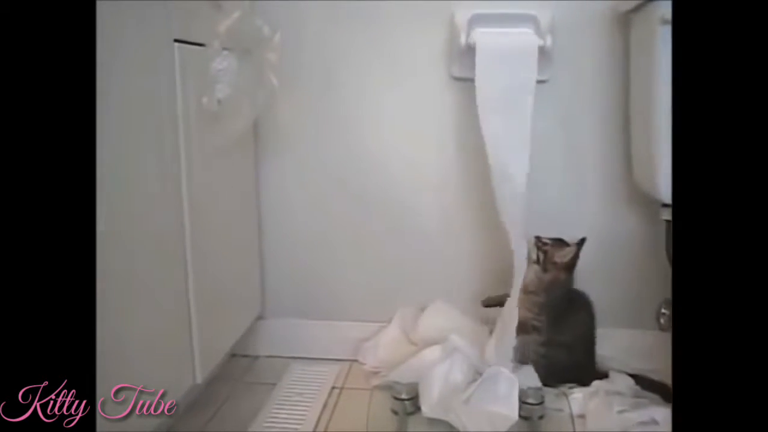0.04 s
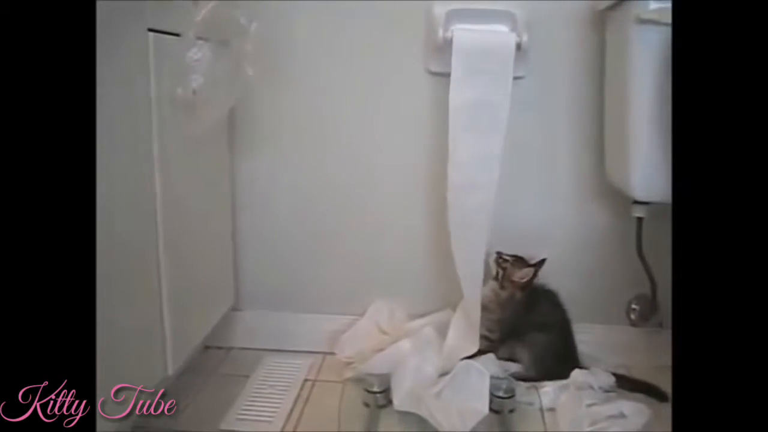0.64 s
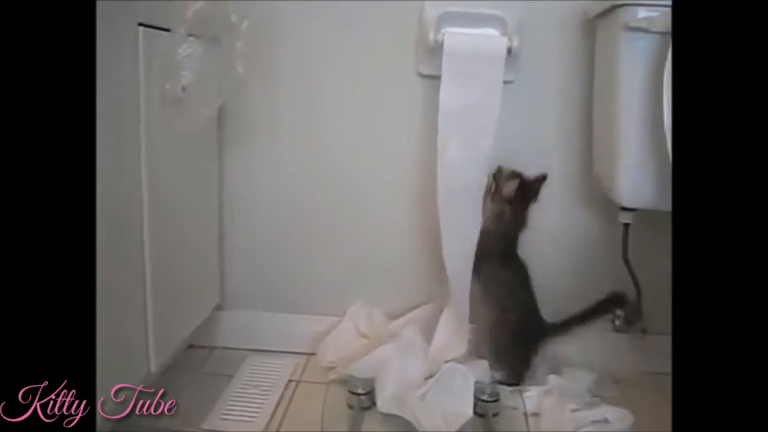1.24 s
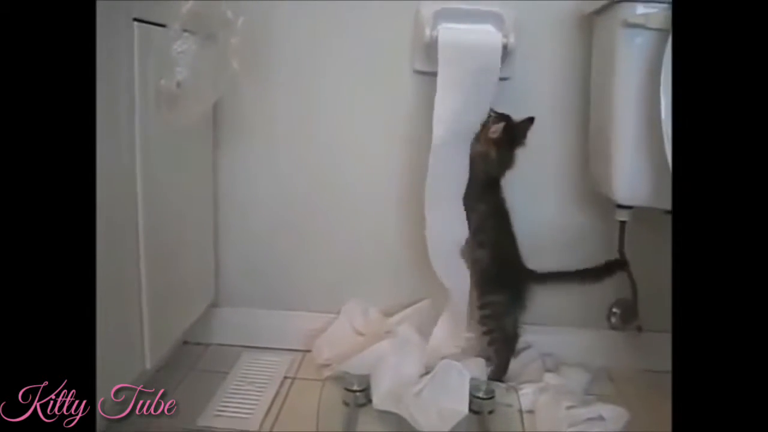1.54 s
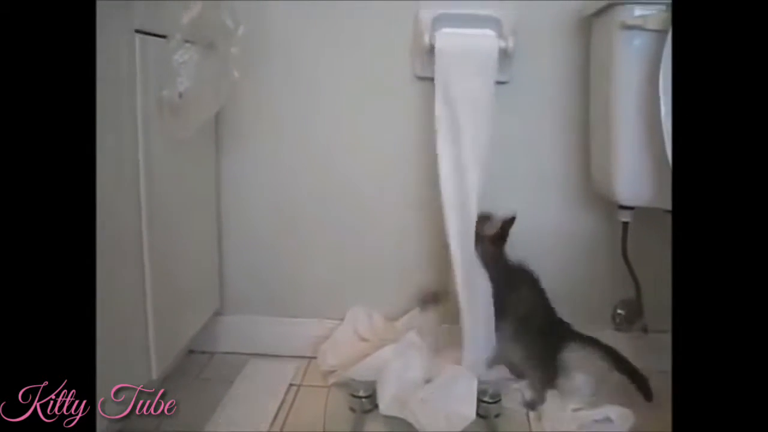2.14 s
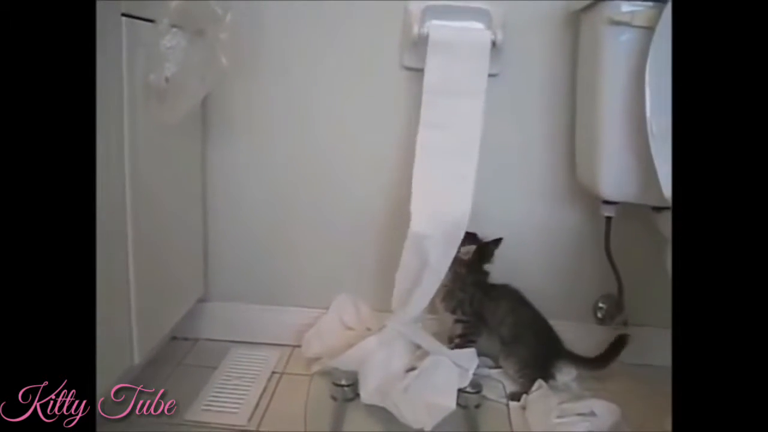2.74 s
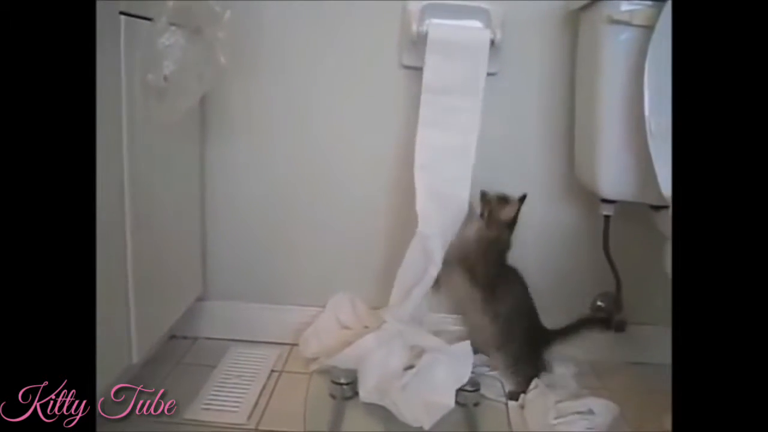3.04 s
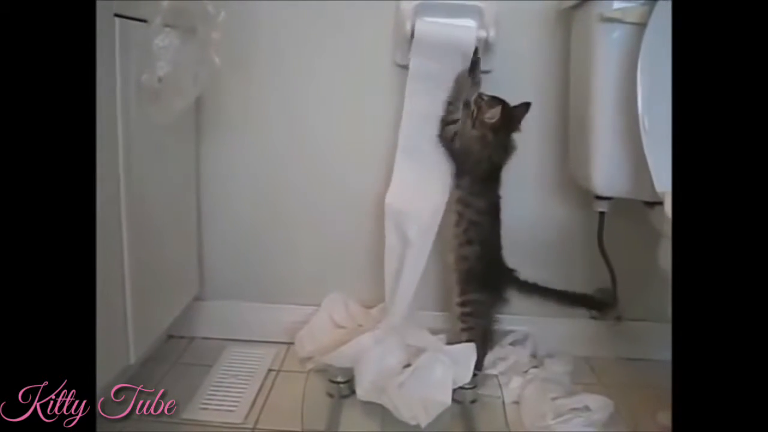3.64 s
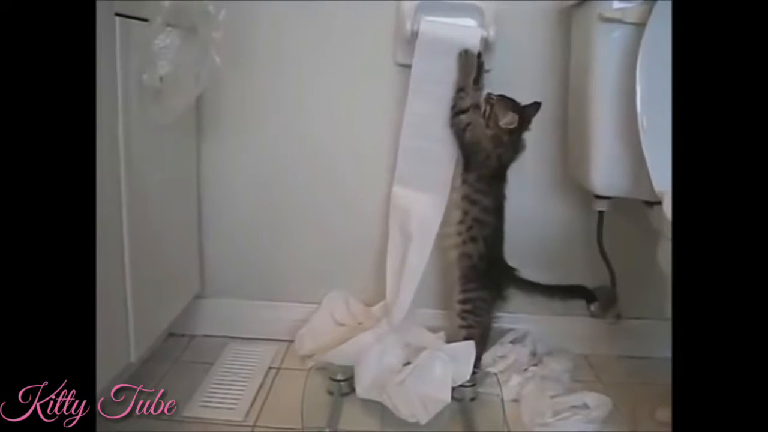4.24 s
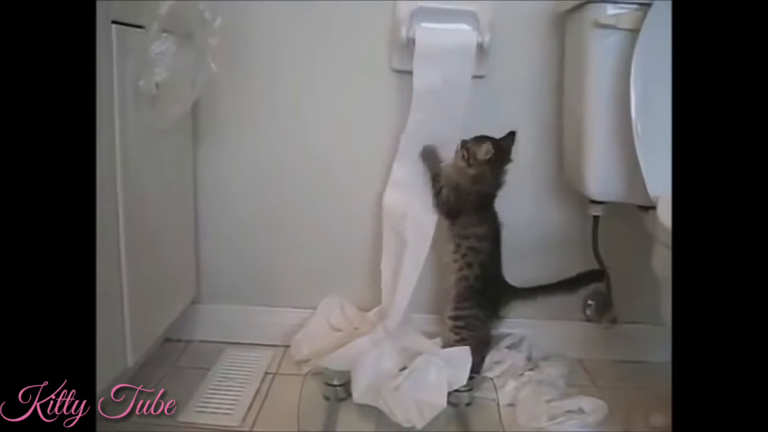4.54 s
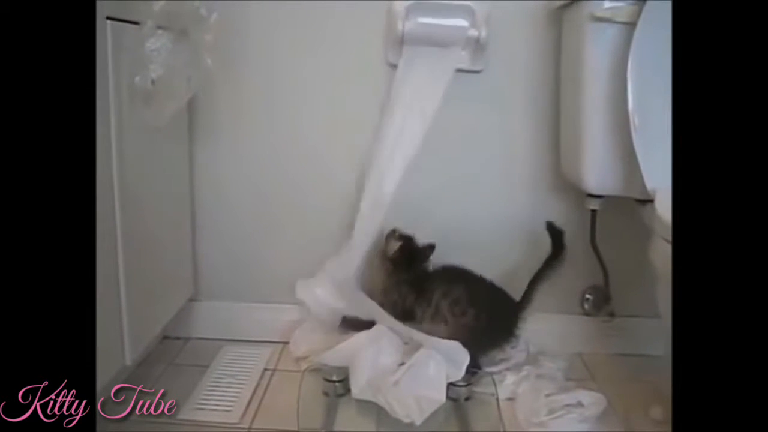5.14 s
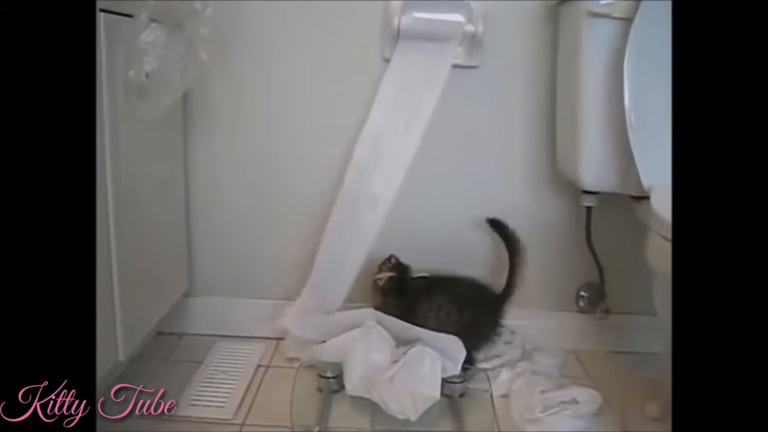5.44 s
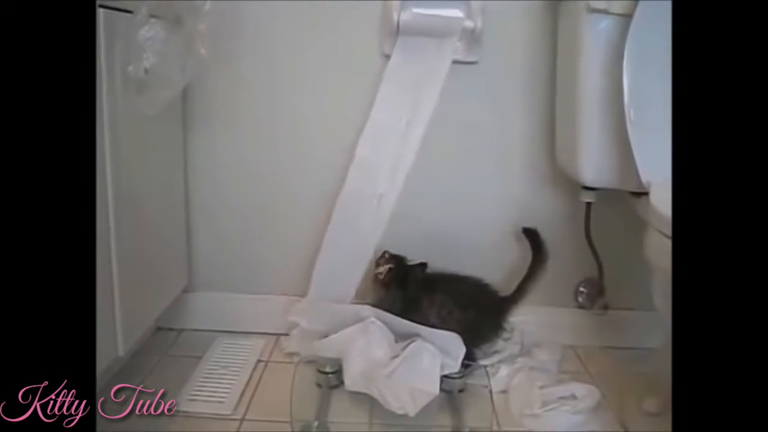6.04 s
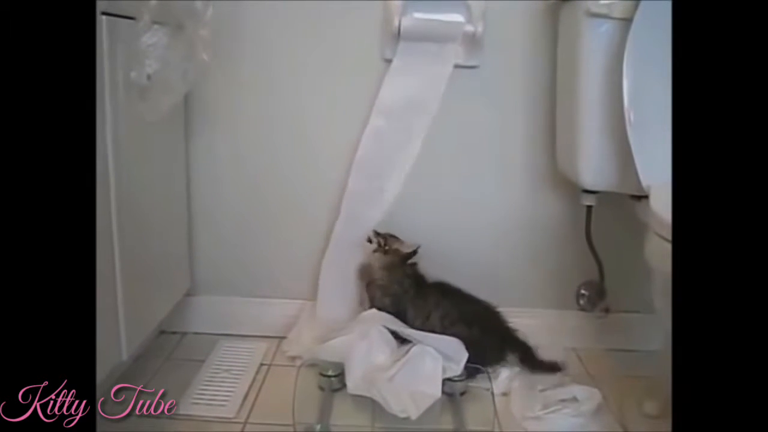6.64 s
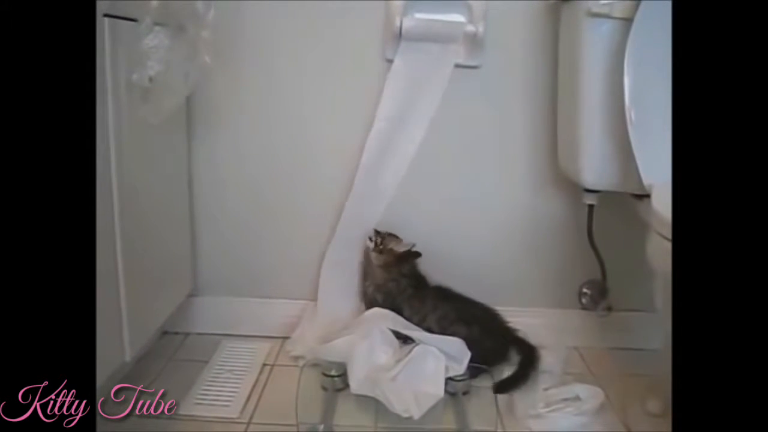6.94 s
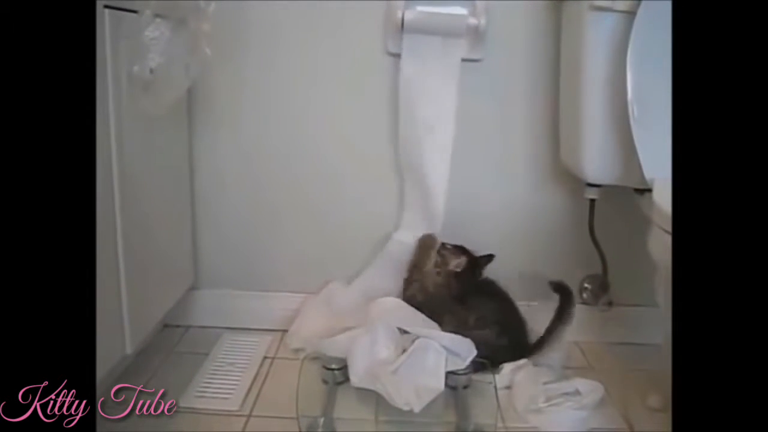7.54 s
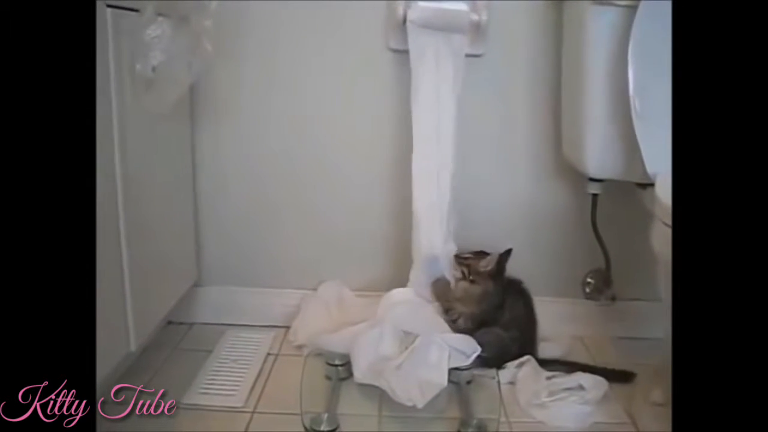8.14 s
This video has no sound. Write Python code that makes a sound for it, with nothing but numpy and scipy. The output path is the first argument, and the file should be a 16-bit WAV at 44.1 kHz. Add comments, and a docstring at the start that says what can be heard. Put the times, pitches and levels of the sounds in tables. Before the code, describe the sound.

A kitten paws at hanging toilet paper, starting with a quick flap and a hollow plastic clack. The sheet rustles and crinkles in irregular bursts, and clusters of tugs knock the cardboard tube around in its holder. Midway the spindle gives brief squeaks, then the knocking gives way to lighter crinkles and a soft paw thud. The small tiled bathroom rings after each sound over a faint air hum.

```python
"""A quick flap of paper and a hollow plastic clack: a kitten paws at a hanging toilet roll.
The sheet slides, crinkles and flaps in bursts, and tugs knock the cardboard tube about in its holder.
The roll rubs and chirps on its spindle, paws thud softly on the floor and single creases snap.
A small tiled bathroom rings after every sound, over a faint air hum; all of it is in mono."""
import sys
import numpy as np
from scipy import signal
from scipy.fft import rfft, irfft
from scipy.io import wavfile
from scipy.ndimage import uniform_filter1d

SR = 44100
rng = np.random.default_rng(int(sys.argv[2]) if len(sys.argv) > 2 else 0)


def persist_wave(psi):
    """Save psi, clipped to +-1, as 16-bit WAV."""
    counts = np.round(np.clip(psi, -1, 1) * 32767).astype(np.int16)
    wavfile.write(sys.argv[1], SR, np.atleast_2d(counts).T)


N = 366030
T = np.arange(N) / SR


def undb(db):
    """Decibels to gain."""
    return 10 ** (np.asarray(db) / 20)


def unit(x):
    """Scale to rms 1."""
    return x / np.sqrt(np.mean(x ** 2))


def colour(x, points, size=2048):
    """Causal EQ through (f/Hz, gain/dB) points, built from the cepstrum."""
    hz, db = np.transpose(points)
    freqs = np.maximum(np.fft.rfftfreq(size, 1 / SR), 1)
    gain = undb(np.interp(np.log(freqs), np.log(hz), db))
    cepstrum = irfft(np.log(gain))
    cepstrum[1:size // 2] *= 2
    cepstrum[size // 2 + 1:] = 0
    impulse = irfft(np.exp(rfft(cepstrum)))
    return signal.fftconvolve(x, impulse)[:len(x)]


def resonate(x, modes):
    """Parallel resonances (f/Hz, width/Hz, gain/dB) of alternating sign."""
    return sum((-1) ** k * undb(db) * signal.lfilter(*signal.iirpeak(hz, hz / width, fs=SR), x)
               for k, (hz, width, db) in enumerate(modes))


def focus(x, hz, width_hz):
    """The same resonance twice in series: a tighter band with steeper skirts."""
    band = [(hz, width_hz, 0)]
    return resonate(resonate(x, band), band)


def wander(rate):
    """Smooth random drift of spread near 1."""
    hold = int(SR / rate)
    steps = np.repeat(rng.standard_normal(N // hold + 1), hold)
    return uniform_filter1d(steps, hold)[:N] * np.sqrt(3 / 2)


def grains(rate, spread_db):
    """Random tiny slips and buckles: many weak ones, a few strong."""
    happens = rng.random(N) < rate / SR
    size = undb(spread_db * np.minimum(rng.exponential(size=N), 4))
    return unit(happens * size * rng.choice([-1, 1], N))


def chatter(length_s):
    """A contact is a few milliseconds of tiny impacts, followed by silence to ring in."""
    t = T[:512]
    window = np.sqrt(t / length_s) * np.exp(-(t / length_s) ** 4)
    spectrum = rfft(rng.standard_normal(len(t)) * window)
    # half whitened, so each contact keeps a little colour of its own
    burst = irfft(spectrum / np.sqrt(np.abs(spectrum))) * np.sqrt(window)
    return np.pad(burst, (0, SR // 5))


def add(track, s, sound, db):
    """Mix in a one-shot at s seconds; db is its energy spread over 4 ms."""
    start = int(s * SR)
    gain = undb(db) * np.sqrt(.004 * SR / np.sum(sound ** 2))
    track[start:start + len(sound)] += gain * sound[:N - start]


def swipe(start, length):
    """One paw stroke swells, holds while the paw pulls, and dies away; long ones settle more slowly."""
    attack_s, release_s = 0.39 * length, 0.012 + 0.1 * length
    swell = np.clip((T - start) / attack_s, 0, 1)
    return swell * np.exp(-np.clip(T - start - length, 0, 1) / release_s)


# the kitten's swipes: t/s, length/s, rustle level/dB, crinkle re rustle/dB, flap re rustle/dB
SWIPES = [(0.0, 0.037, -45.5, -6, 1), (0.159, 0.071, -61, -13, 4.5), (0.28, 0.13, -51, -9.5, -13),
          (0.4, 0.28, -53.5, -12, -15), (1.191, 0.16, -53.5, -6.5, -14), (1.536, 0.12, -59.5, -8, 4.5),
          (1.74, 0.036, -34.5, -24, -5), (1.783, .11, -45.5, -2.5, -16), (1.915, 0.066, -55.5, -14, 1),
          (2.156, 0.17, -44, -5, -11.5), (2.371, .11, -49.5, -18, -3), (2.883, 0.058, -69.5, -18, 3.5),
          (3.081, 0.1, -54, -10, -16), (3.387, .11, -33.5, -28, -13), (3.498, 0.06, -45, 3.5, -19),
          (3.632, 0.14, -39, 0, -22), (4.14, 0.058, -56.5, 1, -23), (4.24, .07, -62, 6, -10),
          (4.426, 0.025, -46.5, 2.5, -17), (4.539, 0.031, -40, -5, -4.5), (4.798, 0.094, -53, -4, -6.5),
          (5.013, 0.1, -49.5, -10, -7.5), (5.183, 0.1, -30, -7, -19), (5.284, 0.073, -35.5, -2.5, -11.5),
          (6.154, 0.12, -50.5, -3.5, -22), (6.978, 0.083, -59, -2.5, -8.5),
          (7.455, 0.065, -48.5, -5, -16.5), (7.678, 0.16, -53, -5, -20), (8.009, 0.086, -43.5, -1, -11),
          (8.108, 0.12, -55, 5, -15)]
# fader ride of the sheet sliding and swaying, most around a hard tug: t/s, level before trim/dB
SLIDE_RIDE = [(0.0, -47.5), (1.2, -70.5), (1.73, -50), (2.22, -62.5), (2.36, -45), (2.82, -64.5),
              (3.4, -55), (3.58, -55), (3.81, -51), (3.95, -64), (4.95, -56), (5.25, -33.5), (5.59, -58),
              (6.17, -75), (6.36, -55), (7.51, -64.5), (7.63, -49.5), (8.3, -49)]


def sheet_motion(slide_trim_db=-4.5):
    """Envelopes of rustle, crinkle and flap: the powers of the slide and of every swipe add up."""
    slide = undb(np.interp(T, *np.transpose(SLIDE_RIDE)) + slide_trim_db)
    power = np.outer(undb([0, -5, -12.5]), slide) ** 2  # the slide's rustle, crinkle, flap balance
    for start, length, db, crinkle_db, flap_db in SWIPES:
        stroke = undb(db) * swipe(start, length)
        power += np.outer(undb([0, crinkle_db, flap_db]), stroke) ** 2
    return np.sqrt(power)


# paper EQs (mid rustle, crisp crinkle, low flap, snapping fold): f/Hz, gain/dB
RUSTLE_EQ = [(150, -19.5), (450, -14), (900, -1), (1500, 1.5), (2700, 1), (4300, 1.5), (6000, -2.5),
             (7500, -10.5), (15000, -14)]
CRINKLE_EQ = [(1500, -19), (4000, 6.5), (6500, 3), (8000, 1), (10500, 2.5), (13000, -1), (15500, -17)]
FLAP_EQ = [(30, -23), (70, -8.5), (115, -10.5), (165, 2.5), (280, -3), (500, 2), (800, -4), (2000, -29)]
SNAP_EQ = [(400, -12), (1200, -0.5), (3000, 4), (6000, 1), (10000, -7), (15500, -24)]


def paper(crackle_db=-8):
    """The sheet rubs along itself, its fibres crinkle, stray folds pop, and the loose length flaps."""
    rubbing, crinkling, flapping = sheet_motion()
    catch = undb(1.3 * wander(rate=70))  # the paper catches and lets go
    # larger folds give way in small clusters, heard in both rustle and crinkle
    buckles = unit(signal.fftconvolve(grains(rate=400, spread_db=3.5), chatter(length_s=0.001))[:N])
    rustle = unit(colour(grains(rate=9000, spread_db=2.0) + 0.75 * buckles, RUSTLE_EQ))
    crinkle = unit(colour(grains(rate=14000, spread_db=2.5) + 0.32 * buckles, CRINKLE_EQ))
    flap = unit(colour(grains(rate=2500, spread_db=0.5), FLAP_EQ))
    pop_shape = np.hanning(int(0.0035 * SR))
    pop_power = signal.fftconvolve(grains(rate=45, spread_db=1.0) ** 2, pop_shape)[:N]
    pops = np.sqrt(np.abs(pop_power)) * rng.standard_normal(N)
    crackle = undb(crackle_db) * unit(colour(pops, SNAP_EQ))
    return catch * (rubbing * rustle + crinkling * (crinkle + crackle) + flapping * flap)


# EQ of the air bed: f/Hz, gain/dB
AIR_EQ = [(15, -48), (25, 3), (71, -3.5), (215, -8.5), (297, -1), (421, -9), (684, -10), (762, -13),
          (919, 1.5), (1050, -8.5), (1140, -1.5), (1340, -12.5), (7300, -21.5), (7910, -21), (15500, -30)]
# hum bands in the air: f/Hz, width/Hz, rms level/dB
HUM_BANDS = [(303.3, 26.5, -69), (900, 70, -65.5), (7740, 75, -79.5)]


def air(hiss_db=-60.5):
    """Room tone: a faint steady hiss with a few narrow bands of hum."""
    bed = undb(hiss_db) * unit(colour(rng.standard_normal(N), AIR_EQ))
    for hz, width, db in HUM_BANDS:
        hum = focus(rng.standard_normal(N), hz, 1.56 * width)  # 1.56 offsets the double filtering
        bed += undb(db) * unit(hum)
    return bed


# reverb of the tiles: f/Hz, t60/s, wet re dry/dB
TILE_REVERB = [(100, 1, 5), (286, 0.59, 4), (675, 0.37, 5), (1530, 0.37, 2.5), (4000, 0.34, -4.5),
               (8250, 0.3, -4), (14000, 0.19, -13)]
# standing waves between the walls: f/Hz, width/Hz, gain/dB
STANDING_WAVES = [(154.4, 7.6, 5), (206, 11.6, 2)]


def bathroom(x, build_s=0.00054):
    """Close hard walls give a dense tail at once; the treble dies first and low standing waves boom."""
    t = T[:SR]
    hz, t60, wet_db = np.transpose(TILE_REVERB)
    log_freqs = np.log(np.maximum(np.fft.rfftfreq(SR, 1 / SR), 1))
    noise = rfft(rng.standard_normal(SR))
    tail = 0
    for share, decay in zip(np.eye(len(hz)), t60):
        band = irfft(noise * np.interp(log_freqs, np.log(hz), share), SR)
        tail = tail + band * np.exp(-np.log(1000) * t / decay)
    # a diffuse field spreads its energy evenly over neighbouring frequencies
    spectrum = rfft(tail)
    spectrum /= np.sqrt(uniform_filter1d(np.abs(spectrum) ** 2, size=30))
    wet = undb(np.interp(log_freqs, np.log(hz), wet_db))
    tail = irfft(spectrum * wet, SR) * np.minimum(t / build_s, 1)
    return x + signal.fftconvolve(x, tail[:SR // 2])[:N] + resonate(x, STANDING_WAVES)


# hollow body of the cardboard tube, clack of the plastic holder: f/Hz, width/Hz, gain/dB
TUBE_MODES = [(225, 163, -6), (528, 94, 3), (900, 280, 1.5), (1360, 280, 5), (1860, 650, -9), (1350, 25, 5),
              (2540, 980, 3), (1780, 75, 0.5)]
HOLDER_MODES = [(3100, 860, -8), (4015, 390, 1.5), (4770, 480, -2), (5930, 1000, -2.5), (4680, 34, -0.5),
                (4103, 57, -5), (5420, 38, 0), (3107, 24, 2.5), (6030, 58, 6.5)]
# EQ of the sharp contact tick: f/Hz, gain/dB
TICK_EQ = [(2500, -49), (6000, 4), (7000, 5.5), (8100, 2.5), (10000, 5), (12500, -3), (15500, -9)]
# the roll hits its holder: t/s, clack level/dB, tube re clack/dB, tick re clack/dB
ROLL_HITS = [(0.0199, -24.5, -6, -7.5), (1.5729, -35, -3.5, -5.5), (1.735, -20, 0, -6.5),
             (1.7634, -28, 1.5, -11), (1.8401, -32.5, -3, -3), (1.8788, -28, -4.5, -5),
             (2.284, -33.5, 3.5, -6), (2.412, -35, -0.5, -11), (2.418, -26, -3.5, -17),
             (3.359, -31.5, -3, -6), (3.374, -21.5, -1.5, -2.5), (3.377, -15, -9.5, -24),
             (3.4355, -24, -0.5, -14), (3.846, -20.5, -18.5, -6), (4.1668, -40.5, -7, -14),
             (4.267, -44.5, -20, -16), (4.2884, -39.5, -14, -14), (4.302, -44.5, -18, -6),
             (4.409, -42.5, -12, -7), (4.5407, -28.5, -8, -3.5), (4.945, -42.5, 1, -25),
             (5.0562, -33.5, -4.5, -13), (5.157, -30, -4, -15), (5.186, -19, -11.5, -11),
             (5.2302, -19.5, -1.5, -14), (7.023, -48, 4.5, -9)]


def roll_knocks(strike_hz=4000, octaves_per_db=0.87):
    """Each knock rings the cardboard tube and the plastic holder, with a tick at the contact."""
    out = np.zeros(N)
    for s, clack_db, tube_db, tick_db in ROLL_HITS:
        soft_push = colour(chatter(length_s=0.004), [(100, 1.5), (2200, -2.0), (4500, -9.5)])
        add(out, s, resonate(soft_push, TUBE_MODES), clack_db + tube_db)
        # where the holder is struck decides which modes speak: the EQ peak rises with the tube's share
        hz = strike_hz * 2 ** (octaves_per_db * tube_db)
        strike_eq = [(hz / 3, -22), (hz / 1.87, -8), (hz, 0), (hz * 1.01, -3), (hz * 2, -15)]
        strike = colour(chatter(length_s=0.0037), strike_eq)
        add(out, s, resonate(strike, HOLDER_MODES), clack_db)
        add(out, s, colour(chatter(length_s=0.0049), TICK_EQ), clack_db + tick_db)
    return out


# the roll turns: start t/s, end t/s, f/Hz, filter width/Hz, level/dB
ROLL_TURNS = [(1.583, 1.71, 1450, 400, -54), (2.318, 2.562, 1362, 60, -51), (4.227, 4.295, 4050, 700, -52),
              (4.86, 5.26, 1355, 70, -54), (7.5, 7.82, 1780, 200, -60.5)]


def roll_rubs():
    """Dry slips of the tube on the spindle ring one narrow resonance while the roll turns."""
    out = np.zeros(N)
    for start, end, hz, width_hz, db in ROLL_TURNS:
        first, length = int(start * SR), int((end - start) * SR)
        rub = unit(focus(rng.standard_normal(length), hz, width_hz))
        out[first:first + length] += undb(db) * rub * signal.windows.tukey(length)
    return out


# soft footfalls: t/s, level/dB
PAW_FALLS = [(1.733, -47), (2.285, -40), (7.023, -62), (8.059, -42.5)]


def paw_thuds():
    """A padded paw on the floor gives only a low, quickly damped bump."""
    out = np.zeros(N)
    for s, db in PAW_FALLS:
        add(out, s, focus(chatter(length_s=0.0028), hz=180, width_hz=130), db)
    return out


# chirps of the spindle: t/s, f/Hz, level/dB
CHIRPS = [(2.284, 1790, -39), (2.728, 1260, -44), (4.554, 1680, -20.5), (4.556, 2980, -28),
          (4.562, 1950, -25.5), (4.8702, 1330, -38.5), (5.008, 1340, -35), (5.014, 1760, -45),
          (5.16, 1330, -32)]


def spindle_chirps(width_share=0.31):
    """The spindle catches in its socket, and the short slip sings for a few cycles around one pitch."""
    out = np.zeros(N)
    for s, hz, db in CHIRPS:
        add(out, s, focus(chatter(length_s=0.0075), hz, width_share * hz), db)
    return out


# single creases giving way: t/s, level/dB
CREASE_HITS = [(4.449, -49), (4.8317, -41), (6.5532, -49.5), (7.46, -43.5), (7.4722, -38.5), (7.492, -33),
               (7.9515, -36), (8.0258, -38.5), (8.064, -40), (8.1725, -37), (8.247, -42)]


def crease_snaps():
    """A fold snaps through in one short, bright burst."""
    out = np.zeros(N)
    for s, db in CREASE_HITS:
        add(out, s, colour(chatter(length_s=0.0064), SNAP_EQ), db)
    return out


def scene():
    """Paper, roll and paws ring in the room over the air bed, the same in both channels."""
    foley = paper() + crease_snaps() + roll_knocks() + spindle_chirps() + roll_rubs() + paw_thuds()
    mono = bathroom(foley) + air()
    return np.array([mono, mono])


def record(dry):
    """A steep high cut at 15.5 kHz takes off the very top."""
    return signal.sosfilt(signal.ellip(10, .2, 70, 15500, fs=SR, output="sos"), dry)


dry = scene()
out = record(dry)
persist_wave(out)
```